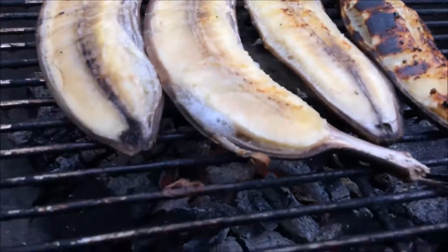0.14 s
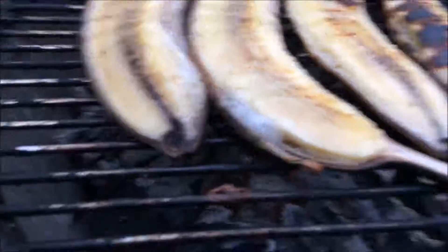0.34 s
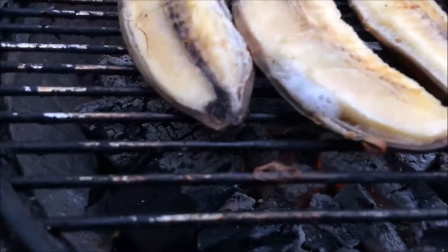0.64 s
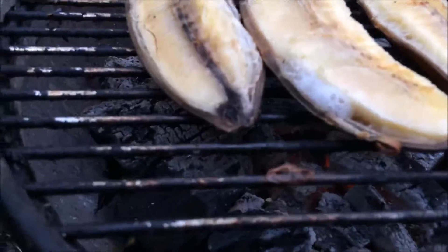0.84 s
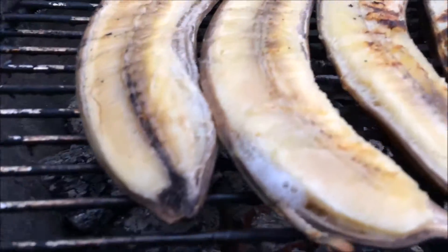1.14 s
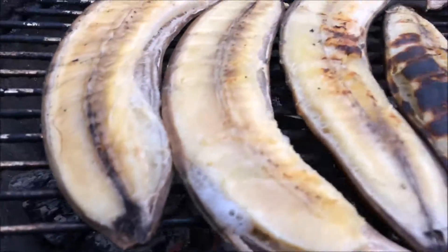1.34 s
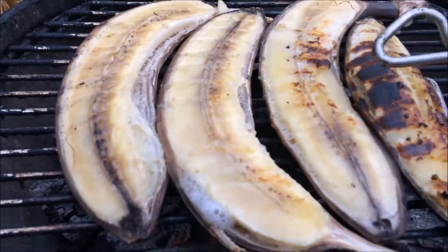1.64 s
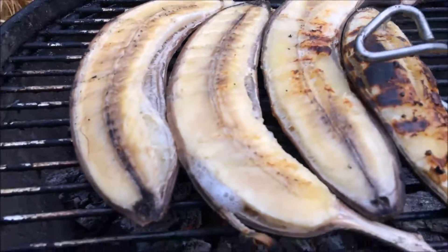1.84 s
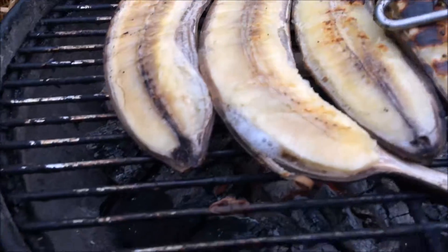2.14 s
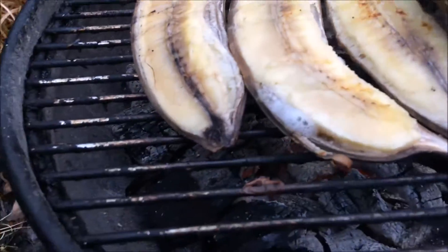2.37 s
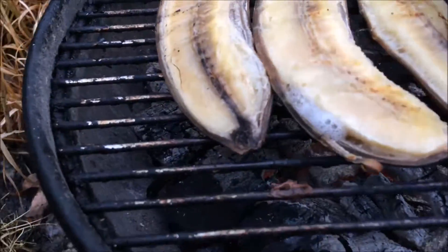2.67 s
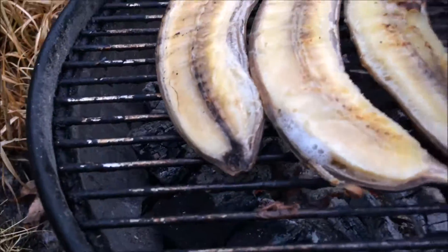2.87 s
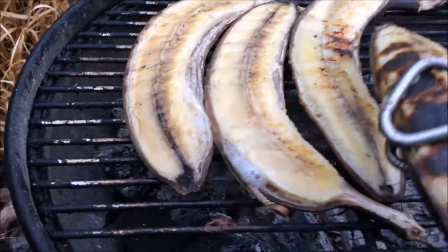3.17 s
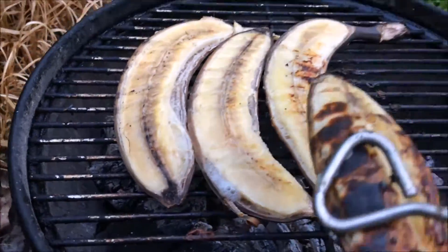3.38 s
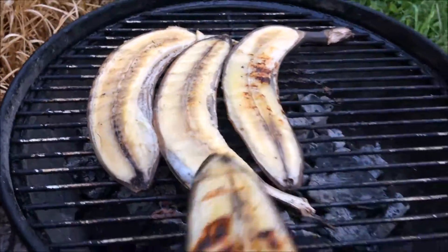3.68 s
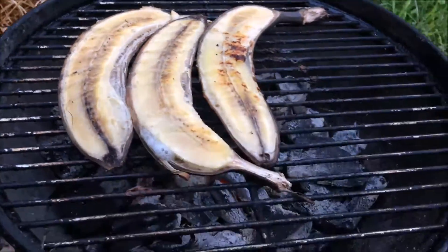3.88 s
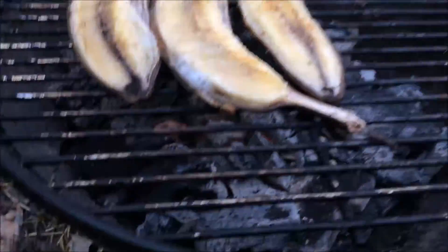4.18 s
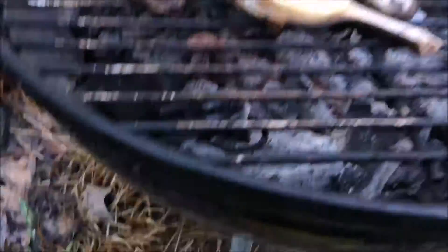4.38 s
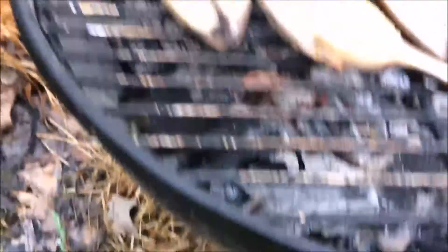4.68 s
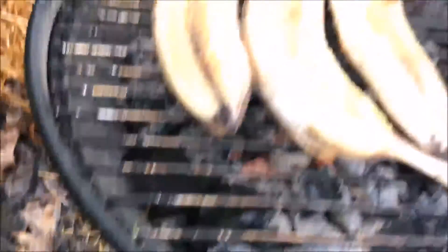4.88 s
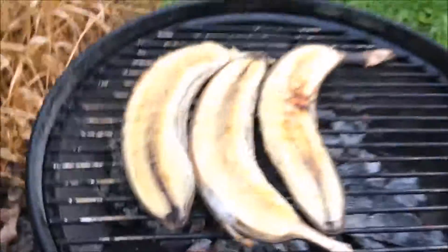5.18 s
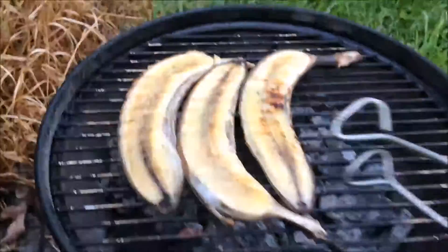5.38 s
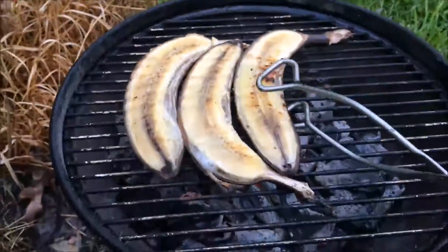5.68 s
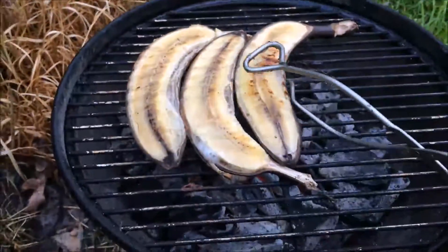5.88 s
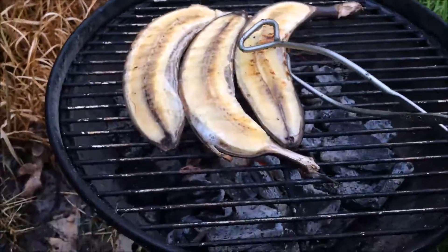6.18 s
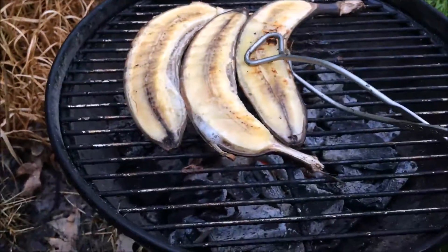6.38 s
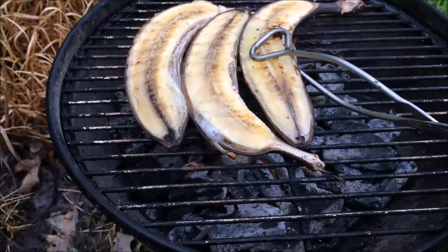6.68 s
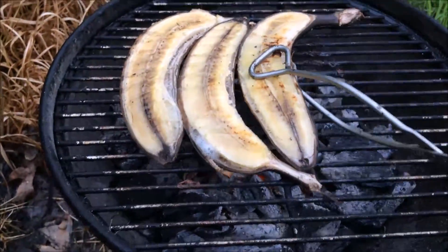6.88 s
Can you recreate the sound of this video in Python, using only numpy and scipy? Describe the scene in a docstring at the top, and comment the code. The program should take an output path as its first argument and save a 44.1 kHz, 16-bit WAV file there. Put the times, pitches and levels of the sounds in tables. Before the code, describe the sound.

Close, dry outdoor sound from a small microphone: quiet frying hiss and crackling coals throughout, a low hollow thump, a sharp metallic knock followed by light rattling drags over steel bars, a pause of sizzling and popping, one ringing snap of wire tongs, then softer clinks and a short scrape. Faint early chirps and low far traffic sit underneath.

```python
"""Wire tongs knock and drag on the steel grate of a small charcoal grill outdoors, and once snap shut close by.
Grate and tongs are sums of fading sine tones plus fading noise; dragging is random ticks sent through resonators.
Fruit skins sizzle and spit and coals tick, all made of shaped noise and ticks; a hollow tray is bumped (low tones).
A far bird chirps in sliding sines and traffic rumbles as low noise. A level control turns loud moments down."""
import sys
import numpy as np
from scipy import signal
from scipy.fft import rfft, irfft, next_fast_len
from scipy.io import wavfile
from scipy.ndimage import map_coordinates

SR = 44100
rng = np.random.default_rng(int(sys.argv[2]) if len(sys.argv) > 2 else 0)


def to_wav(sig):
    """Store sig (one row per channel, or 1-D mono) as 16-bit WAV at the path in sys.argv[1].

    Samples outside -1..1 are clipped; the rate is SR.
    """
    pcm = np.clip(np.atleast_2d(sig), -1, 1) * 32767
    pcm = np.round(pcm).astype(np.int16)
    wavfile.write(sys.argv[1], SR, pcm.T)  # frames by channels


N = 309670

# Times to fade by 60 dB (fade_s) are starting values: some functions scale them for each event.
# ringing tones of the grate: pitch_hz, fade_s, then rim_db, mid_bar_db, centre_db, far_side_db by place struck
GRATE_TONES = [(370, 0.106, -16, 0, 0, 1), (962, 0.14, -31, -11, -12, -12), (1160, 0.06, -9, -19, -13, -18),
               (1285, 0.082, -8, -17, -13, -9), (1680, 0.102, -16, -27, -17, -6),
               (2000, 0.07, -26, -4, -8, -8), (2190, 0.115, -12, 3, 1, -8),
               (2690, 0.129, -19, -21, -19, -8), (3345, 0.065, -21, -16, -9, -10),
               (3690, 0.058, -9, -5, -6, -11), (3850, 0.05, 4, -5, -6, -9),
               (3980, 0.095, -18, -14, -16, -17), (4160, 0.087, -18, -5, -5, -17),
               (4275, 0.14, -17, -13, -11, -19), (4350, 0.14, -16, -10, -15, -22),
               (4520, 0.068, -8, -4, 5, -4), (4710, 0.097, -8, 1, 2, -13),
               (5136, 0.071, -10, -10, -11, -18), (5435, 0.107, -15, -8, -13, -28),
               (5585, 0.065, -11, -4, -6, -23), (6218, 0.127, -16, -20, -21, -37),
               (6471, 0.064, -5, -15, -7, -19), (6668, 0.09, -5, -24, -20, -26),
               (7144, 0.11, -13, -14, -26, -35), (7247, 0.081, -15, -8, -14, -26),
               (8708, 0.11, -19, -12, -25, -35), (9285, 0.1, -12, -18, -22, -36),
               (9866, 0.091, -21, -16, -22, -33), (10465, 0.111, -21, -22, -34, -33)]
# the places a blow can land, in the order of the level columns above
PLACES = ["rim", "mid-bar", "centre", "far side"]
# blows on the grate: start_s, place, level_db, bowl_knock_db, clatter_db, slope_below_2khz_db_per_octave,
# slope_above_4khz_db_per_octave, rise_s, ring_scale (1 = normal fade); level_db applies to all the parts
BLOWS_OF_THE_WIRE_TONGS_ON_THE_STEEL_GRATE = [(1.0715, "rim", -13, -16.5, -1, -7.5, 0, 0.0016, 0.68),
                                              (1.0791, "rim", -26.5, 0, -9, 3.5, -14, 0.0024, 1.32),
                                              (2.1665, "far side", -36.5, -3, 3, 2, -16, 0.003, 1.16),
                                              (5.6414, "centre", -30, 9, 0.5, 2, -10, 0.0017, 0.85),
                                              (5.648, "centre", -54.5, 0, 14.5, 2, -4, .0028, 3.6),
                                              (5.7021, "mid-bar", -19.5, -1.5, -3.5, 1, 7.5, 0.0039, 0.49),
                                              (5.729, "mid-bar", -45, 14.5, 5, 5, -4, 0.0026, 1.16),
                                              (5.807, "far side", -48.5, 14.5, 1, 6.5, -21, .001, 2.7)]
# two drags along the bars: time_s, rubbing_db, ringing_centre_hz, long_bars_db, bowl_db, squeal_db
DRAGS = [
    [(1.38, -86, 3650, -88, -75, -82), (1.426, -59.5, 3820, -65, -57.5, -72),
     (1.506, -53.5, 4320, -73, -63, -62), (1.562, -69, 4250, -84, -70, -93),
     (1.658, -63, 3770, -73, -63, -47.5), (1.776, -57.5, 3760, -66, -52.5, -59.5),
     (1.796, -50, 4440, -59, -60, -47.5), (1.832, -65, 4280, -68, -59, -64),
     (1.916, -60, 3650, -64, -65, -50.5), (1.992, -55.5, 4140, -66.5, -64, -65),
     (2.084, -71, 3960, -75, -78, -71), (2.118, -58, 4070, -64, -62, -56),
     (2.148, -58, 4130, -59, -70, -64)],
    [(5.77, -61, 4270, -60, -56, -73), (5.816, -55, 4400, -54, -42, -61),
     (5.836, -49.5, 4730, -60, -47, -67), (5.918, -56.5, 4430, -64, -46.5, -73),
     (5.962, -54.5, 4370, -77, -64, -73), (6.008, -55, 3670, -65, -58, -66),
     (6.064, -62, 3900, -75, -65, -75), (6.126, -62.5, 3870, -79, -75, -81),
     (6.14, -82, 4000, -85, -78, -70)],
]
# ringing tones of the tongs: pitch_hz, level_db, fade_s
TONGS_TONES = [(975, -14, .165), (1082, -25, .2), (1180, -4, .03), (1300, -4, .03), (1567, -15, .21),
               (1667, -14, .13), (1873, -26, .14), (2037, -1, .065), (2456, -22, .21), (2982, -15, .12),
               (3040, -14, .07), (3662, -9, .08), (3838, -17, .16), (4271, -4, .07), (4310, -4, .125),
               (4959, -18, .095), (5441, -4, .07), (5915, -15, .087), (6030, -12, .1), (6684, -12, .1),
               (6764, -11, .14), (7062, -3, .08), (7769, -12, .07), (8039, -8, .085), (8098, -10, .11),
               (8376, -11, .065), (9303, -12, .086), (9761, -18, .096), (10855, -12, .055),
               (11548, -16, .07), (12420, -18, .05)]
# two damped touches, then the snap and its rebound: start_s, level_db, ring_scale, clatter_db (over level_db)
SNAPS = [(4.5911, -28.5, 0.1, 14.5), (4.5952, -10.5, 0.13, -10), (4.607, -11, 1.12, -3),
         (4.608, -28, .08, -15)]
# colour of clattering metal: pitch_hz, level_db (per Hz, relative)
CLATTER_COLOUR = [(330, -74), (560, -36.5), (720, -4.5), (1300, -5.5), (2000, -6.5), (2700, -8.5),
                  (4000, -6), (7000, -10), (10500, -13.5), (13000, -20), (14300, -14.5), (15300, -28),
                  (16300, -55)]
# how fast the clatter dies at each pitch: pitch_hz, fade_s
CLATTER_FADE = [(500, 0.13), (2000, 0.088), (6000, 0.16), (11000, 0.098), (15000, 0.076)]
# the clearest spits of juice and coal: start_s, peak_db, pop_db (duller part, relative to the bright part)
CLEAR_SPITS = [(0.7194, -40, -10), (0.7472, -41.5, 0), (0.7755, -43.5, -10), (0.8259, -39, -22),
               (0.9514, -42, 0), (1.222, -48, 15), (1.6465, -34.5, -20), (1.8957, -34.5, 0),
               (2.2618, -36.5, -2), (2.4047, -37.5, -3), (2.5137, -42.5, 3), (2.564, -42, 8),
               (2.585, -42, 13), (2.774, -36, 4), (3.412, -27.5, -22), (3.4673, -46, -8), (3.488, -47, -2),
               (3.5059, -41, -4), (3.664, -47, -1), (3.682, -42, -4), (4.154, -41.5, 8), (4.37, -46, -10),
               (4.561, -37.5, 5), (5.1867, -40.5, 4), (5.308, -28, -31), (6.412, -42.5, -6),
               (6.442, -39.5, 5), (6.695, -37, -8), (6.8936, -44, 2)]
# colour of a bright spit: pitch_hz, level_db (per Hz, relative)
SPIT_COLOUR = [(880, -58), (1500, -56), (2960, -3.5), (4700, -9.5), (5300, -11), (6160, 5.5), (8320, -3),
               (10800, -2), (12900, 0.5), (14400, -6.5), (16400, -11.5)]
# bumps on a hollow tray beside the grill: start_s, level_db, rise_s, low_thump_db (added below 500 Hz)
BUMPS = [(.2925, -51.5, .001, -3), (0.4357, -47.5, .0005, -15), (0.4778, -23, 0.00053, -4.5),
         (.4935, -31.5, 0.0014, -14), (.4995, -40, .002, 8), (4.5945, -19.5, 0.0032, -26),
         (4.6076, -39.5, 0.00047, -31.5)]
# hollow tones of the tray: pitch_hz, level_db, fade_s
TRAY_TONES = [(129, -2, 0.025), (453, 15.5, 0.0046), (674, 2, 0.028), (990, -24, 0.031)]
# loudness of the sizzle over time: time_s, level_db
SIZZLE_LEVEL = [(0, -62.5), (.75, -59.5), (1.35, -60.5), (1.62, -60.5), (1.68, -54), (1.84, -58.5),
                (2.3, -58.5), (2.6, -61.5), (4, -63), (5.83, -61), (6.3, -61.5), (7.02, -61.5)]
# colour of the sizzle: pitch_hz, level_db (per Hz, relative)
SIZZLE_COLOUR = [(880, -33.5), (1500, -1.5), (2020, -2), (2190, -5), (2890, -7), (3260, -4.5),
                 (6950, -10.5), (8400, -10.5), (14100, -16.5), (15300, -22), (15650, -48)]
# middle of each group of small sizzling bursts: pitch_hz
BURST_MIDDLES = [5000, 8000, 12000]
# a far bird's falling notes: start_s, length_s, start_pitch_hz, level_db
CHIRPS = [(.05, .07, 3350, -73), (.41, .09, 3190, -70), (.54, .05, 3180, -68), (.62, .045, 3110, -71),
          (.81, .05, 3200, -71), (.95, .05, 3200, -71), (1.24, .1, 3190, -69)]
# colour of the traffic: pitch_hz, level_db (per Hz, relative)
TRAFFIC_COLOUR = [(12, -52), (20, -20), (49, -5.5), (118, -3), (156, -8), (319, -12.5), (399, -13.5),
                  (736, -17), (902, -13.5), (1080, -15.5), (1380, -13.5), (2600, -45), (3380, -62.5),
                  (5720, -120)]

THUD_DB = -13.5  # each low thud tone, relative to the blow
SHORT_DB, SHEEN_DB, RASP_DB, SCRATCH_DB = -8.5, -13, -13, -4  # parts of a drag, relative to the rubbing
SNAP_RISE_S = 0.0011
SMALL_SPITS, SMALL_DB, SMALL_SPREAD_DB = 40, -49, 2.5  # how many, middle peak level, spread either way
SPIT_FADE_S, SPIT_GROWS = 0.007, 0.55  # 60 dB fade of a -40 dB spit; dB of time gained per dB of size
SPIT_RISE_S = 0.00046
FALL_HZ_PER_S = 3500
TRAFFIC_DB = -59.5
TOP_HZ = 16500


def amp(db):
    """Multiplier for a level in dB."""
    return 10 ** (np.asarray(db) / 20)


def unit(x):
    """Scales a sound to an rms (average strength) of 1."""
    return x / np.sqrt(np.mean(x ** 2) + 1e-20)


def along(points, hz):
    """Reads a value between (pitch, value) points, with pitch on a log scale."""
    f, v = np.transpose(points)
    return np.interp(np.log(hz + 1), np.log(f + 1), v)


def curves(rows):
    """Joins each column after the time with straight lines, -120 outside the rows."""
    time_s, *columns = np.transpose(rows)
    return [np.interp(np.arange(N) / SR, time_s, c, -120, -120) for c in columns]


def wobble(rate):
    """A smooth random curve with rate random points a second."""
    points = rng.standard_normal(int(N * rate / SR) + 4)
    return map_coordinates(points, [np.arange(N) * rate / SR])


def filtered(x, response):
    """Multiplies each pitch in x by response(pitch)."""
    size = next_fast_len(len(x) + 8192)
    return irfft(rfft(x, size) * response(np.fft.rfftfreq(size, 1 / SR)), size)[:len(x)]


def coloured(x, spectrum):
    """Weights the pitches of x by a colour table, at rms 1."""
    return unit(filtered(x, lambda hz: amp(along(spectrum, hz))))


def add(track, start_s, sound):
    """Mixes a sound into the track, cut off at the track's end."""
    part = track[round(start_s * SR):][:len(sound)]
    part += sound[:len(part)]


def swell(t, rise_s):
    """A soft start: contact builds up over roughly rise_s."""
    return 1 - np.exp(-t / rise_s)


def ring(hz, db, fade_s, rise_s, scatter_db):
    """Tones of a struck object start together and fade, each at a slightly random strength."""
    t = np.arange(SR // 3)[:, None] / SR
    level_db = db + scatter_db * rng.standard_normal(len(hz)) - 60 * t / fade_s
    phase = 2 * np.pi * (hz * t + rng.random(len(hz)))
    return (amp(level_db) * np.sin(phase)).sum(axis=1) * swell(t[:, 0], rise_s)


def clatter(ring_scale):
    """Noise stands in for the countless weak tones of bent wire, each pitch band dying at its own speed."""
    noise = coloured(rng.standard_normal(SR // 3), CLATTER_COLOUR)
    hz, t, bands = signal.stft(noise, SR, nperseg=128)
    fade_s = ring_scale * along(CLATTER_FADE, hz)[:, None]
    return signal.istft(bands * amp(-60 * t / fade_s), SR, nperseg=128)[1][:SR // 3]


def grains(rate, spread_db):
    """Random single-sample ticks, about rate a second, of either sign and varied size."""
    on = rng.random(N) < rate / SR
    return on * rng.choice([-1, 1], N) * amp(spread_db * rng.standard_normal(N))


def resonate(x, hz, fade_s):
    """Lets x set off one ringing tone, at rms 1."""
    r = amp(-60 / (fade_s * SR))  # what remains after each sample
    return unit(signal.lfilter([1, 0, -1], [1, -2 * r * np.cos(2 * np.pi * hz / SR), r * r], x))


def knocks():
    """Where a blow lands decides which grate tones answer; the grill bowl adds a thud and a short knock."""
    out = np.zeros(N)
    hz, fade_s, *places = np.transpose(GRATE_TONES)
    t = np.arange(SR // 3) / SR
    for blow in BLOWS_OF_THE_WIRE_TONGS_ON_THE_STEEL_GRATE:
        start_s, place, level_db, knock_db, clatter_db, low, high, rise_s, ring_scale = blow
        bars = ring(hz, places[PLACES.index(place)], ring_scale * fade_s, rise_s, scatter_db=1)
        thud = ring(np.array([105, 190]), THUD_DB, 0.05, rise_s, scatter_db=1)
        knock = ring(np.array([398]), knock_db, 0.045, rise_s, scatter_db=1)

        def clatter_gain(f):
            octaves_below = np.log2(np.clip(2000 / (f + 1), 1, 4))  # stops at two octaves
            octaves_above = np.log2(np.maximum(f / 4000, 1))
            return amp(clatter_db + low * octaves_below + high * octaves_above)

        rattle = filtered(clatter(0.86 * ring_scale), clatter_gain) * swell(t, rise_s)
        add(out, start_s, amp(level_db) * (bars + thud + knock + rattle))
    return out


def slips():
    """Uneven slips of wire on rough steel: random ticks whose strength wanders."""
    return grains(1200, spread_db=6.5) * amp(3.6 * wobble(45))


def drag():
    """Slips set off the bars under the wire, the bowl and two singing rods, plus bright scraping."""
    both_drags = [curves(rows) for rows in DRAGS]
    rub_db, centre_hz, long_db, bowl_db, squeal_db = np.max(both_drags, axis=0)
    bars = np.zeros(N)
    for hz, fade_s, _, mid_db, centre_db, _ in GRATE_TONES[1:20]:
        # short-bar tones far in pitch from the moving centre get less of the rubbing, by up to 7 dB
        octaves_away = np.abs(np.log2(hz / np.maximum(centre_hz, 1)))
        near_db = -np.minimum(9 * octaves_away, 7)
        is_short = hz > 2900
        level_db = rub_db + SHORT_DB + near_db if is_short else long_db
        place_db = 0.25 * (mid_db + centre_db)
        bars += amp(level_db + place_db) * resonate(slips(), hz, 0.55 * fade_s)
    bowl = resonate(resonate(slips(), 385, 0.036), 385, 0.029)
    squeal = unit(resonate(slips(), 1665, 0.03) + 0.48 * resonate(slips(), 1745, 0.047))
    sheen = resonate(slips(), 6440, 0.03)  # a thin rod
    rasp = coloured(slips(), SPIT_COLOUR)
    scratch = coloured(slips(), CLATTER_COLOUR)
    bright = amp(SHEEN_DB) * sheen + amp(RASP_DB) * rasp + amp(SCRATCH_DB) * scratch
    return bars + amp(rub_db) * bright + amp(bowl_db) * bowl + amp(squeal_db) * squeal


def snap():
    """The jaws of the tongs meet and ring; a held touch chokes the ringing at once."""
    out = np.zeros(N)
    hz, db, fade_s = np.transpose(TONGS_TONES)
    rise = swell(np.arange(SR // 3) / SR, SNAP_RISE_S)
    for start_s, level_db, ring_scale, clatter_db in SNAPS:
        tones = ring(hz, db, ring_scale * fade_s, SNAP_RISE_S, scatter_db=1.5)
        crack = amp(clatter_db) * rise * clatter(0.62 * ring_scale)
        add(out, start_s, amp(level_db) * (tones + crack))
    return out


def spits():
    """Each bursting steam pocket is a brief bright puff with some duller pop; bigger ones last longer."""
    out = np.zeros(N)
    t = np.arange(SR // 20) / SR
    luck = rng.random((SMALL_SPITS, 3))
    small = [(a * N / SR, SMALL_DB + SMALL_SPREAD_DB * (2 * b - 1), -10 * c) for a, b, c in luck]
    for start_s, peak_db, pop_db in CLEAR_SPITS + small:
        puff = coloured(rng.standard_normal(len(t)), SPIT_COLOUR)
        pop = coloured(rng.standard_normal(len(t)), SIZZLE_COLOUR)
        fade_s = SPIT_FADE_S * amp(SPIT_GROWS * (peak_db + 40))
        burst = (puff + amp(pop_db) * pop) * amp(-60 * t / fade_s) * swell(t, SPIT_RISE_S)
        add(out, start_s, amp(peak_db) * burst / np.abs(burst).max())
    return out


def bumps():
    """A soft contact sets only the tray's low, quickly damped tones going."""
    out = np.zeros(N)
    hz, db, fade_s = np.transpose(TRAY_TONES)
    t = np.arange(SR // 10)[:, None] / SR
    for start_s, level_db, rise_s, thump_db in BUMPS:
        low_db = thump_db * (hz < 500)
        tones = amp(db + low_db - 60 * t / fade_s) * np.sin(2 * np.pi * hz * t)
        push = -tones.sum(axis=1)
        add(out, start_s, amp(level_db) * push * swell(t[:, 0], rise_s))
    return out


def sizzle():
    """Steady frying is flickering hiss plus small bright bursts that come in clumps."""
    level_db, = curves(SIZZLE_LEVEL)
    clumps = amp(2.5 * wobble(9))
    bursts = np.zeros(N)
    for mid_hz in BURST_MIDDLES:
        ticks = grains(110, spread_db=5.0) * clumps
        bursts += filtered(ticks, lambda hz: np.exp(-(np.log2((hz + 1) / mid_hz) / 1.1) ** 2))
    hiss = rng.standard_normal(N) * amp(1.9 * wobble(30))
    return amp(level_db) * coloured(hiss + 0.66 * unit(bursts), SIZZLE_COLOUR)


def bird():
    """Thin sine notes that slide down at one speed, swelling and fading."""
    out = np.zeros(N)
    for start_s, length_s, hz, level_db in CHIRPS:
        t = np.arange(round(length_s * SR)) / SR
        tone = np.sin(2 * np.pi * (hz - FALL_HZ_PER_S * t / 2) * t)
        add(out, start_s, amp(level_db) * np.sqrt(2) * np.sin(np.pi * t / length_s) * tone)
    return out


def traffic():
    """Far traffic is low coloured noise with an extra, lumpier layer below 220 Hz."""
    rumble = coloured(rng.standard_normal(N) * amp(1.2 * wobble(7)), TRAFFIC_COLOUR)
    uneven = rng.standard_normal(N) * amp(2.6 * wobble(14))
    lumps = filtered(uneven, lambda hz: amp(along(TRAFFIC_COLOUR, hz)) * (hz < 220))
    return amp(TRAFFIC_DB) * unit(rumble + 0.92 * unit(lumps))


def scene():
    """All sources added together in the open air, with no echo."""
    return (knocks() + drag() + snap() + spits() + bumps() + sizzle() + bird() + traffic())[None]


def record(dry):
    """A level control follows recent loudness; then the small microphone loses deep bass and the top is cut."""
    keep = np.exp(-1 / (0.09 * SR))  # 0.09 s memory, applied twice
    once = signal.lfilter([1 - keep], [1, -keep], dry[0] ** 2)
    loud = signal.lfilter([1 - keep], [1, -keep], once)
    gain = (1 + loud / amp(-54.0)) ** -0.2  # loud is a power, so the bend lies at -27 dB rms

    def microphone(hz):
        bass_loss = hz ** 2 / (hz ** 2 + 28 ** 2)
        return bass_loss / (1 + (hz / TOP_HZ) ** 120)

    return filtered(dry[0] * gain, microphone)[None]


dry = scene()
out = record(dry)
to_wav(out)
```